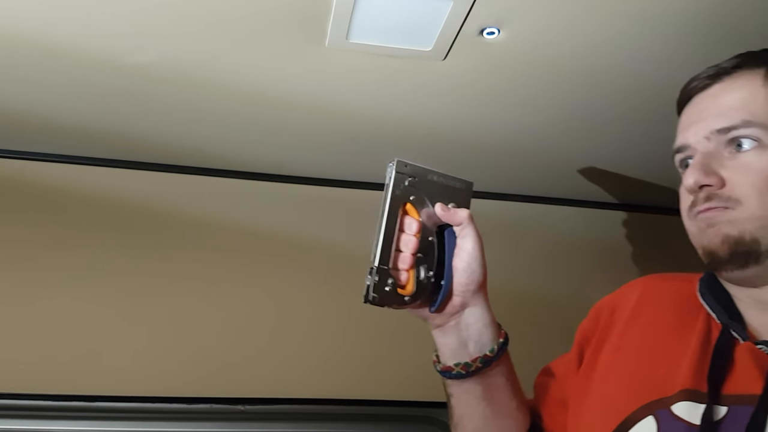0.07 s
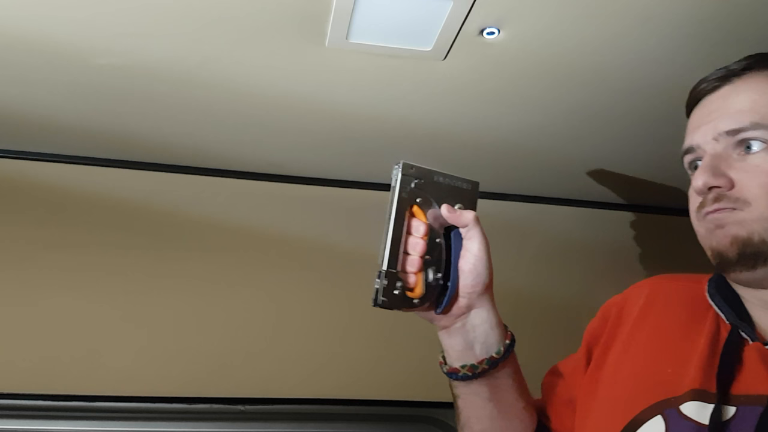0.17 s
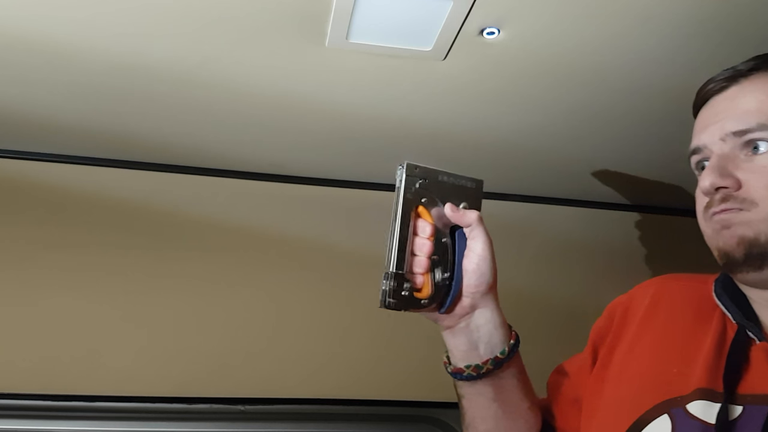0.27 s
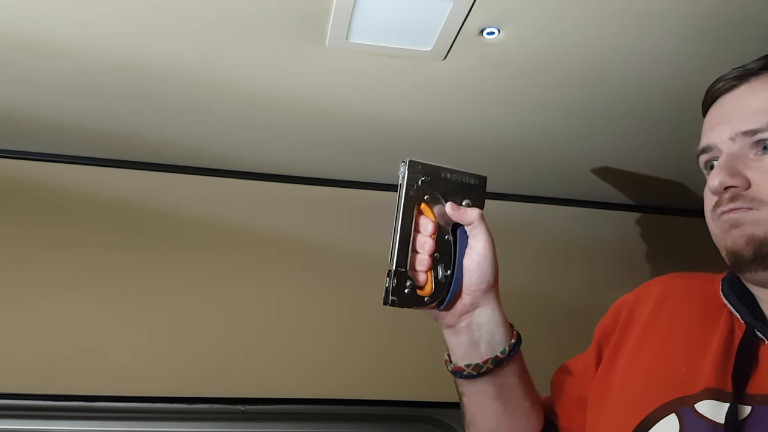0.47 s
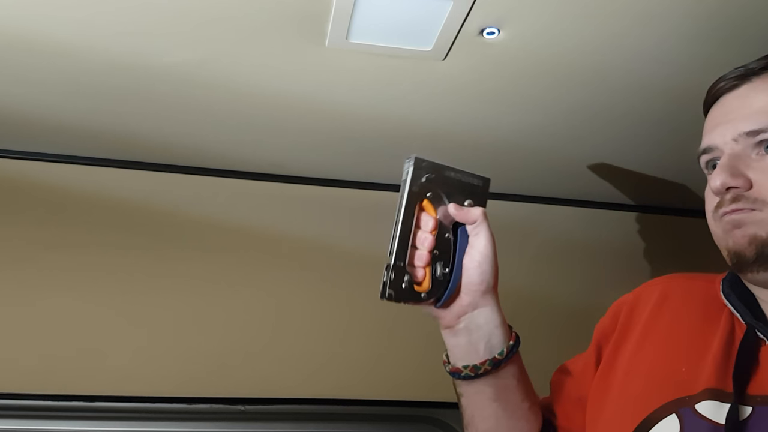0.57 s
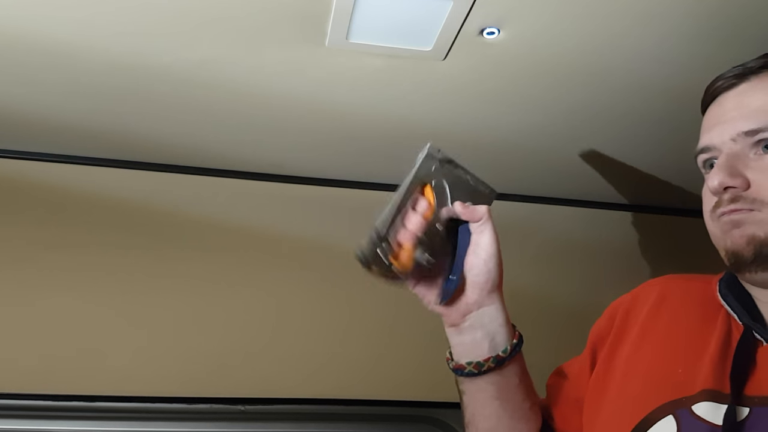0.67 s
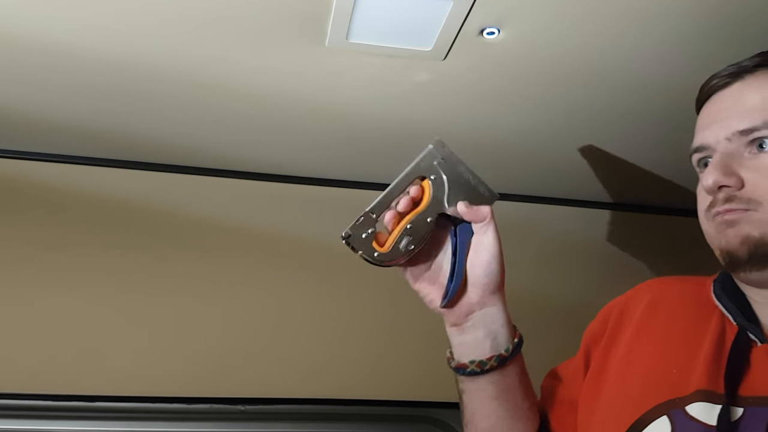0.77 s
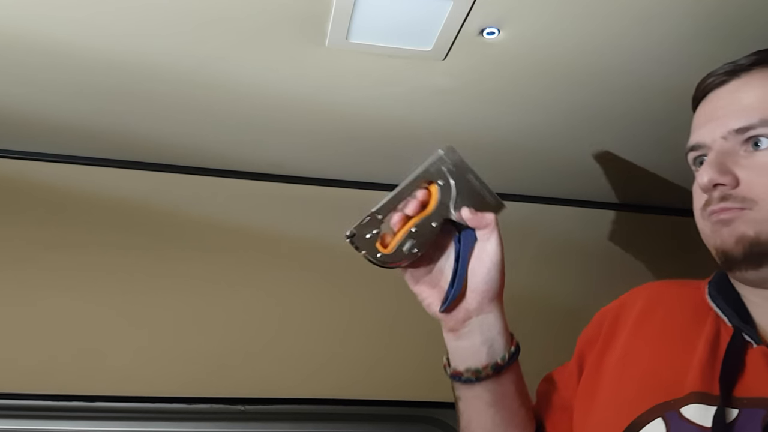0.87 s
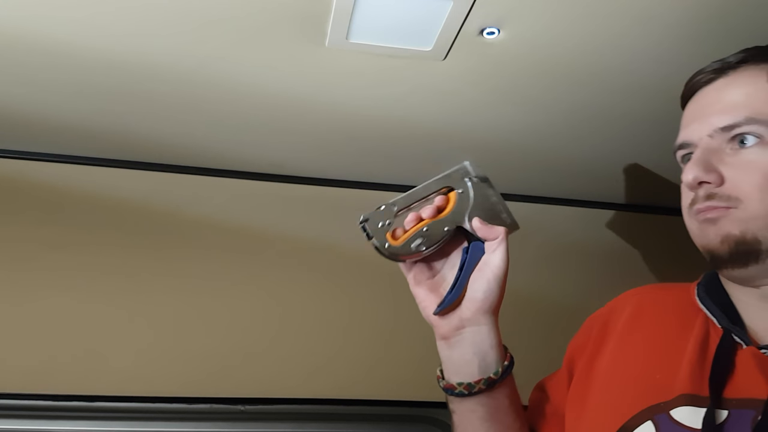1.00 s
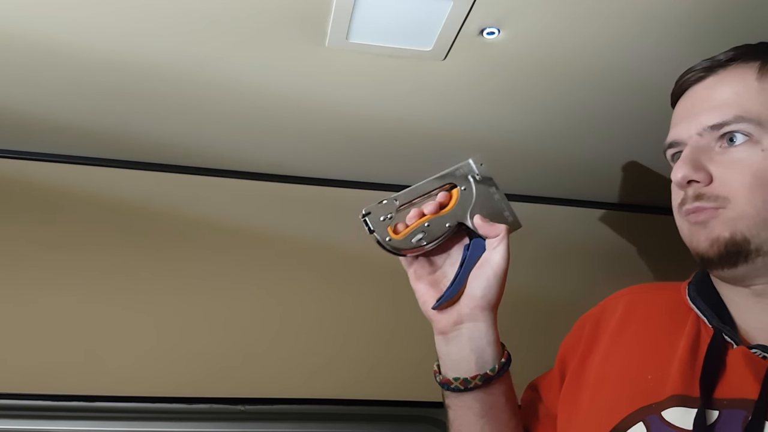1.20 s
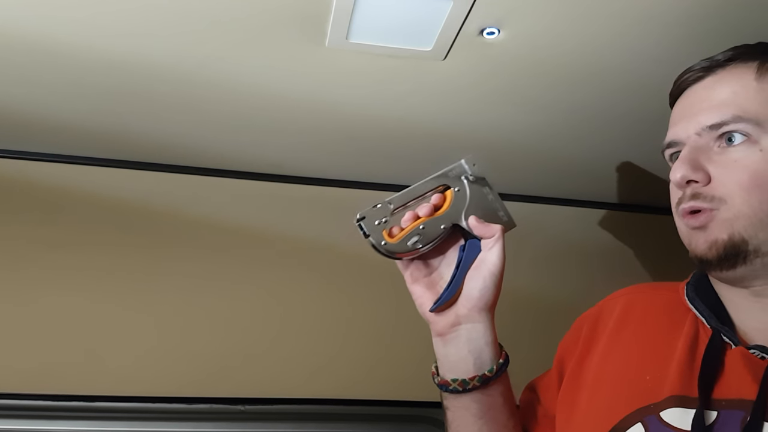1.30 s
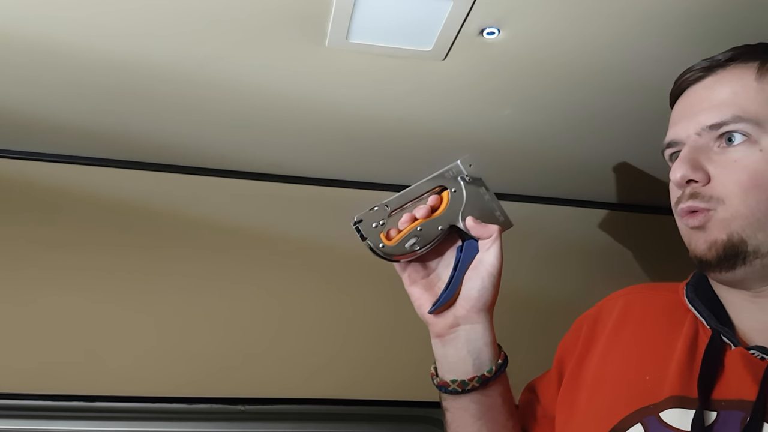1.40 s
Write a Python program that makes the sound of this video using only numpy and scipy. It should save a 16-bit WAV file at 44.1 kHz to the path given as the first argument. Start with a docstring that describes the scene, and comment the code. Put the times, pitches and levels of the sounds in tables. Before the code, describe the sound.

One staple gun shot, close and slightly overloaded: metallic loading click first, then a violent crack with short steel ring and thud, then faint taps, scrapes and a click over low rumble in a van.

```python
"""A steel hand staple gun is squeezed and fired once inside a van, close to the microphone.
The lever clicks and rings as it loads; the striker snaps home with clatter, steel ring and a low thump.
Soft clicks, a tap, scrapes and a squeak follow as it is let go, over faint rumble, hum and hiss.
Contacts are shaped noise with a short cabin tail; rings are decaying sines; the thump is a falling sine."""
import sys
import numpy as np
from scipy import signal
from scipy.fft import rfft, irfft
from scipy.io import wavfile
from scipy.ndimage import uniform_filter1d

SR = 44100
rng = np.random.default_rng(int(sys.argv[2]) if len(sys.argv) > 2 else 0)


def transcribe(signal):
    """Save signal, clipped to [-1, 1], as a 16-bit WAV file at the path in sys.argv[1]."""
    frames = np.atleast_2d(signal).T
    limited = np.clip(frames, -1, 1)
    pcm = np.round(limited * 32767).astype(np.int16)
    wavfile.write(sys.argv[1], SR, pcm)


N = 63945  # samples
TOP_HZ = 15750  # upper limit of coloured noise and microphone


def undb(db):
    """Decibels to amplitude gain."""
    return 10 ** (np.asarray(db) / 20)


def since(start_s):
    """Seconds since start_s, zero before it."""
    return np.maximum(np.arange(N) / SR - start_s, 0)


def freqs():
    """Frequency of each spectral bin in Hz, at least 1."""
    return np.maximum(np.arange(N // 2 + 1) * SR / N, 1)


def noise(colour):
    """Unit-level noise with a spectrum drawn through (Hz, dB) points, cut at TOP_HZ."""
    hz, db = np.array(colour, float).T
    gain = undb(np.interp(np.log(freqs()), np.log(hz), db)) * (freqs() < TOP_HZ)
    x = irfft(rfft(rng.standard_normal(N)) * gain, N)
    return x / x.std()


def below(x, corner_hz):
    """The part of x under a crossover frequency."""
    return irfft(rfft(x) / (1 + (freqs() / corner_hz) ** 4), N)


def envelope(start_s, rise_s, t60_s, hold_s=0):
    """Linear rise times a fall by 60 dB per t60_s; the fall waits hold_s from the start."""
    t = since(start_s)
    rise = np.minimum(t / max(rise_s, 1 / SR), 1)
    fall = np.exp(-np.log(1000) * np.maximum(t - hold_s, 0) / t60_s)
    return rise * fall


def swell(start_s, length_s):
    """A rounded rise and fall."""
    progress = np.minimum(since(start_s) / length_s, 1)
    return np.sqrt(np.maximum(np.sin(np.pi * progress), 0))


def waver():
    """Slowly varying random amplitude and phase, as a complex signal of unit level."""
    blur_hz = 40
    z = below(rng.standard_normal(N), blur_hz) + 1j * below(rng.standard_normal(N), blur_hz)
    return z / z.std()


def ring(start_s, modes, blur_share=0):
    """Decaying partials of a struck body; a share of each one's power is blurred by reflections."""
    t = since(start_s)
    total = np.zeros(N)
    for pitch_hz, level_db, t60_s in modes:
        partial = np.exp(2j * np.pi * (pitch_hz * t + rng.random()))
        blurred = partial * (np.sqrt(1 - blur_share) + np.sqrt(blur_share) * waver())
        total += undb(level_db) * envelope(start_s, 1 / SR, t60_s) * np.imag(blurred)
    return total


BLUR_SHARE = 0.4  # of steel rings


def smooth_power(spectrum):
    """Power spectrum averaged over 600 Hz."""
    return np.abs(uniform_filter1d(np.abs(spectrum) ** 2, int(600 * N / SR))) + 1e-9


def burst(x, shape):
    """A very short burst of the noise x that keeps the broad colour of x."""
    short = rfft(x * shape)
    wanted = smooth_power(rfft(x)) * np.mean(shape ** 2)
    return irfft(short * np.sqrt(wanted / smooth_power(short)), N)


BASS_HZ = 700  # crossover between bass and upper part
CRACK_T60_S, CABIN_T60_S, CABIN_BASS_T60_S = 0.014, 0.17, 0.14


def contact_bands(colour, bass_db, corner_hz):
    """Fresh noise of a contact's colour, dulled above corner_hz, as bass and upper part."""
    x = below(noise(colour), corner_hz)
    bass = below(x, BASS_HZ)
    return undb(bass_db) * bass, x - bass


def click(colour, start_s, level_db, bass_db, corner_hz, crack_db, rise_s):
    """A short metal contact, then its dense reflections in the cabin as two decaying noise bands."""
    shape = envelope(start_s, rise_s, CRACK_T60_S, hold_s=rise_s)
    crack = undb(crack_db) * burst(sum(contact_bands(colour, bass_db, corner_hz)), shape)
    bass, upper = contact_bands(colour, bass_db, corner_hz)
    tail = upper * envelope(start_s, rise_s, CABIN_T60_S)
    bass_tail = bass * envelope(start_s, rise_s, CABIN_BASS_T60_S)
    return undb(level_db) * (crack + tail + bass_tail)


# Rumble spectrum: pitch_hz, density_db
RUMBLE_SPECTRUM = [(25, -6.5), (70, -7), (145, -1.5), (230, -11), (330, -16.5), (530, -23.5), (900, -28),
                   (1400, -33.5), (3500, -40.5), (6000, -50), (16000, -50.5)]
# Rumble level over time: time_s, level_db
RUMBLE_CURVE = [(0, -48.5), (.2, -49), (0.419, -48.5), (0.519, -60), (.75, -65.5), (1.1, -70), (1.45, -63)]
HUM_HZ, HUM_PEAK_RMS_DB = 396.5, -65.5


def rumble_and_hum():
    """Low noise and a thin sine share one curve: down around the shot, up a little at the end."""
    level = undb(np.interp(since(0), *np.array(RUMBLE_CURVE).T))
    sine = np.sqrt(2) * np.sin(2 * np.pi * HUM_HZ * since(0))
    hum = undb(HUM_PEAK_RMS_DB) * level / level.max() * sine
    return noise(RUMBLE_SPECTRUM) * level + hum


# Hiss spectrum: pitch_hz, density_db
HISS_SPECTRUM = [(100, -5), (450, 3.5), (1000, -3), (2000, -12.5), (4000, -19.5), (16000, -24.5)]
# Hiss level over time: time_s, level_db
HISS_CURVE = [(1.2, -75.5), (1.4, -68.5)]


def hiss():
    """Faint steady noise that grows near the end."""
    return noise(HISS_SPECTRUM) * undb(np.interp(since(0), *np.array(HISS_CURVE).T))


# Lever contact spectrum: pitch_hz, density_db
LEVER_SPECTRUM = [(60, -5.5), (200, -2.5), (450, -20.5), (850, -23), (1150, -9.5), (1500, 4.5),
                  (2200, -6.5), (3400, 0.5), (4100, -2.5), (4800, -11), (6300, -6.5), (7900, -10.5),
                  (8900, -1), (10400, -8), (12000, -4.5), (16000, -11)]
# Lever partials: pitch_hz, relative_level_db, t60_s
LEVER_PARTIALS = [(1557, 0, .1), (1858, -4, .14), (2448, -3, .12), (3068, -6, .17), (3445, -2, .14),
                  (7348, 1, .125), (8549, -5, .15), (8777, -3, .14), (8900, -5, .16), (9340, -4, .15),
                  (11790, -3, .13), (12310, -6, .14)]
LOAD_S, LOAD_DB, LEVER_RING_REL_DB = 0.2244, -23.5, -6.5


def lever():
    """The lever clicks and rings as it takes the spring's load."""
    contact = click(LEVER_SPECTRUM, LOAD_S, LOAD_DB,
                    bass_db=-3, corner_hz=22000, crack_db=10, rise_s=0.005)
    steel = ring(LOAD_S, LEVER_PARTIALS, BLUR_SHARE)
    return contact + undb(LOAD_DB + LEVER_RING_REL_DB) * steel


# Soft contacts: start_s, level_db (before treble loss), bass_db, treble_corner_hz,
# crack_over_cabin_tail_db, rise_s
SOFT_CLICKS = [(0.3713, -47.5, -7.5, 6630, 6, 0.0013), (0.6092, -41, -4.5, 22000, -32, 0.0028),
               (0.674, -62, 5, 8000, 2, 0.002), (0.8196, -53.5, 1, 12460, 12, 0.0007),
               (0.8298, -48, -4, 13500, 7, 0.0016), (0.9086, -35, -3, 20200, 13, 0.0015),
               (1.068, -64.5, -1, 3600, 7, 0.0007), (1.1668, -52.5, 5.5, 3710, 3, 0.0015)]
# Soft contact spectrum: pitch_hz, density_db
CLICK_SPECTRUM = [(100, -6), (650, -17), (1080, 0.5), (1500, 1.5), (2300, -2), (2850, -5), (3400, -2.5),
                  (5000, -6), (6400, -10.5), (7900, -12.5), (8700, -3), (11000, -5.5), (13500, -8),
                  (16000, -10.5)]


def mechanism_clicks():
    """Parts of the mechanism touch softly before and after the shot."""
    return sum(click(CLICK_SPECTRUM, *row) for row in SOFT_CLICKS)


# Striker spectrum: pitch_hz, density_db
STRIKER_SPECTRUM = [(100, -9), (500, -5.5), (1000, 0.5), (2000, 1), (3000, -1.5), (4500, -6), (7500, -10.5),
                    (12000, -8), (16000, -8.5)]
RELEASE_S, IMPACT_S, REBOUND_S = 0.4391, 0.4407, 0.4608
RELEASE_DB, IMPACT_DB, REBOUND_DB = -13.5, -3.5, -20.5


def striker():
    """The striker slips off its catch, lands and rebounds: three sharp noise cracks."""
    cracks = [(RELEASE_S, RELEASE_DB), (IMPACT_S, IMPACT_DB), (REBOUND_S, REBOUND_DB)]
    return sum(undb(level_db) * noise(STRIKER_SPECTRUM) * envelope(start_s, 0.00017, t60_s=0.048)
               for start_s, level_db in cracks)


# Clatter spectrum: pitch_hz, density_db
CLATTER_SPECTRUM = [(100, -10), (200, -14.5), (350, -20), (700, -20.5), (1150, -9.5), (1700, -8),
                    (2300, -4.5), (2900, 1), (3700, -8.5), (5200, -9), (6400, -5.5), (7800, -10),
                    (9200, -0.5), (10300, -6), (12000, -2.5), (15500, -7.5)]
CLATTER_DB, CLATTER_HOLD_S = -16.5, 0.034
CLATTER_T60_S, CLATTER_BASS_T60_S = 0.14, 0.11


def clatter():
    """Impact clatter fills the cabin; its bass rises slower and dies faster."""
    x = noise(CLATTER_SPECTRUM)
    bass = below(x, BASS_HZ)
    upper = (x - bass) * envelope(IMPACT_S, 0.00067, CLATTER_T60_S, CLATTER_HOLD_S)
    low = bass * envelope(IMPACT_S, 0.009, CLATTER_BASS_T60_S, CLATTER_HOLD_S)
    return undb(CLATTER_DB) * (upper + low)


SPRING_HZ, SPRING_HALF_WIDTH_HZ = 2850, 650  # -6 dB half-width
SPRING_DB, SPRING_T60_S = -31, 0.26


def spring():
    """The spring's coils ring as a decaying band of noise."""
    band = 1 / (1 + ((freqs() - SPRING_HZ) / SPRING_HALF_WIDTH_HZ) ** 4)
    coils = irfft(rfft(rng.standard_normal(N)) * band, N)
    return undb(SPRING_DB) * coils / coils.std() * envelope(IMPACT_S, 0.0037, SPRING_T60_S)


# Steel housing partials: pitch_hz, relative_level_db, t60_s
HOUSING_PARTIALS = [(950, -1, .09), (1275, -2, .18), (1385, -3, .13), (1586, -2, .13), (2298, -1, .15),
                    (2533, 4, .18), (2727, 0, .17), (2865, 3, .18), (3019, -1, .2), (4490, -4, .17),
                    (6294, -5, .15), (9163, 3, .14), (11149, -4, .15), (11790, -3, .15)]
HOUSING_DB = -24.5


def housing():
    """The steel housing rings from the impact as blurred decaying partials."""
    return undb(HOUSING_DB) * ring(IMPACT_S, HOUSING_PARTIALS, BLUR_SHARE)


# Dull knock partials, cut short with the thump: pitch_hz, level_db, t60_s (before the cut)
KNOCK_PARTIALS = [(55.6, -18, 0.22), (341, -17.5, .12), (416, -17, 0.22), (490, -7.5, .07),
                  (609.4, -8, 0.041), (699.6, -8, 0.02)]
# Thud spectrum: pitch_hz, density_db
THUD_SPECTRUM = [(25, 5.5), (60, 0), (130, -7), (300, -10), (500, -3), (750, -8.5), (1100, -2.5),
                 (2500, -42)]
THUMP_S, THUMP_LENGTH_S, THUMP_DB = 0.4446, 0.021, -3
THUMP_START_HZ, THUMP_DROP_HZ = 218.5, 178
THUD_DB, THUD_T60_S = -11.5, 0.018


def low_thump():
    """A low puff of air thumps the microphone: a sine sags and stops, with a knock and a noise thud."""
    t = since(THUMP_S)
    progress = np.minimum(t / THUMP_LENGTH_S, 1)
    stop = 1 - progress ** 6
    pitch_hz = (THUMP_START_HZ - THUMP_DROP_HZ * progress ** 2) * (t > 0)
    phase = 2 * np.pi * np.cumsum(pitch_hz) / SR
    thump = undb(THUMP_DB) * envelope(THUMP_S, 0.00086, t60_s=0.21) * np.sin(phase)
    knock = ring(THUMP_S, KNOCK_PARTIALS) * np.minimum(t / 0.00025, 1)
    thud = undb(THUD_DB) * noise(THUD_SPECTRUM) * envelope(THUMP_S, 0.0011, THUD_T60_S, hold_s=0.0059)
    return stop * (thump + knock) + thud


def settling():
    """Loose parts settle after the shot: one soft decaying noise."""
    return undb(-50) * noise(CLICK_SPECTRUM) * envelope(0.566, rise_s=0.012, t60_s=0.22)


# Handle tap spectrum: pitch_hz, density_db
HANDLE_SPECTRUM = [(100, -8), (350, -3), (550, 1), (850, 1), (1300, -14), (4000, -45)]


def handle_tap():
    """The handle taps dully at the end of its travel: low, soft-edged noise."""
    return undb(-49) * noise(HANDLE_SPECTRUM) * envelope(0.611, rise_s=0.01, t60_s=0.17)


# Lever rubs: start_s, length_s, level_db
PIVOT_RUBS = [(0.796, 0.027, -71.5), (0.885, 0.018, -55)]
# Rub spectrum: pitch_hz, density_db
RUB_SPECTRUM = [(500, -25), (1100, -7), (1800, 7.5), (2500, -2), (3500, -12), (6000, -20), (16000, -30)]
SQUEAK_S, SQUEAK_LENGTH_S, SQUEAK_HZ, SQUEAK_DB = 1.085, 0.085, 1345, -73


def pivot():
    """The returning lever rubs (noise), then squeaks (sine), both with a grainy random level."""
    grain = np.abs(waver())
    rub_level = sum(undb(level_db) * swell(start_s, length_s) for start_s, length_s, level_db in PIVOT_RUBS)
    scrapes = noise(RUB_SPECTRUM) * grain * rub_level
    squeak_level = undb(SQUEAK_DB) * swell(SQUEAK_S, SQUEAK_LENGTH_S) * np.sqrt(grain)
    squeak = squeak_level * np.sin(2 * np.pi * SQUEAK_HZ * since(SQUEAK_S))
    return scrapes + squeak


# Lasting ring partials: pitch_hz, level_db, t60_s
RETURN_PARTIALS = [(1000, -75, 1.4), (1350, -73, 0.69)]


def return_ring():
    """A faint lasting ring of two partials after the lever returns."""
    return ring(0.909, RETURN_PARTIALS)


def scene():
    """The staple gun in the van."""
    load = lever()
    shot = striker() + clatter() + spring() + housing() + low_thump()
    mechanism = settling() + handle_tap() + mechanism_clicks() + return_ring()
    background = rumble_and_hum() + hiss()
    return (load + shot + mechanism + background + pivot())[None]


def record(dry):
    """The microphone overloads smoothly towards full scale and cuts the top."""
    clipped = dry / (1 + dry ** 6) ** (1 / 6)
    top_cut = signal.ellip(10, 0.2, 70, TOP_HZ, fs=SR, output="sos")
    return signal.sosfilt(top_cut, clipped)


dry = scene()
out = record(dry)
transcribe(out)
```